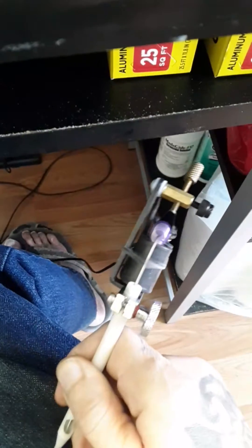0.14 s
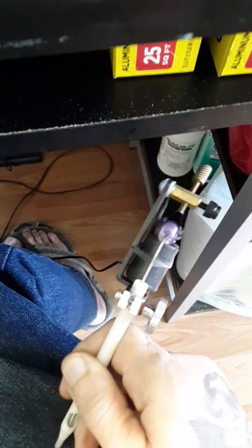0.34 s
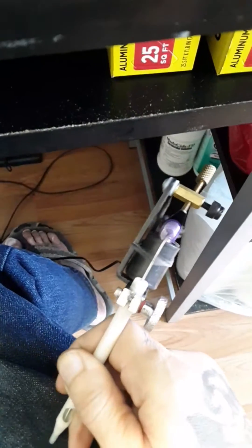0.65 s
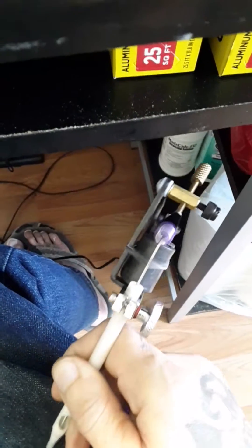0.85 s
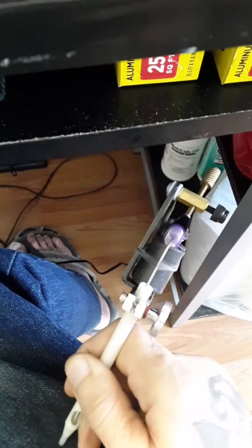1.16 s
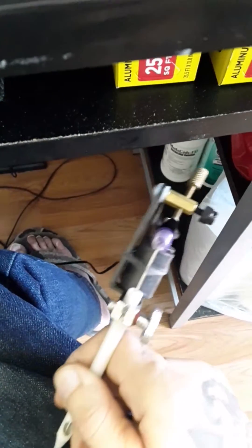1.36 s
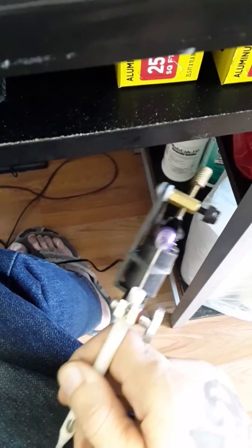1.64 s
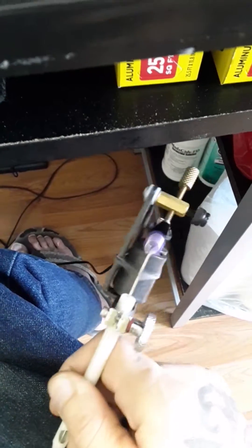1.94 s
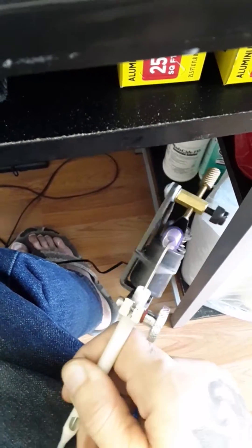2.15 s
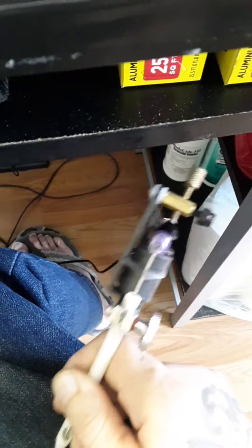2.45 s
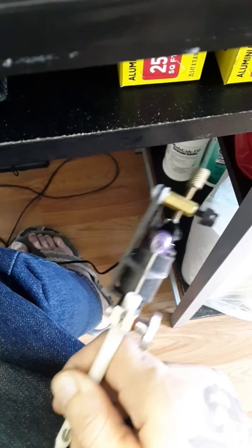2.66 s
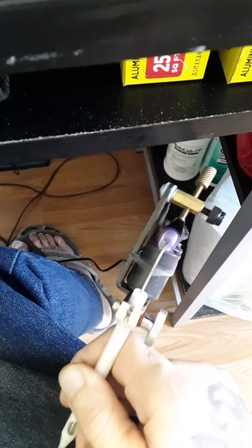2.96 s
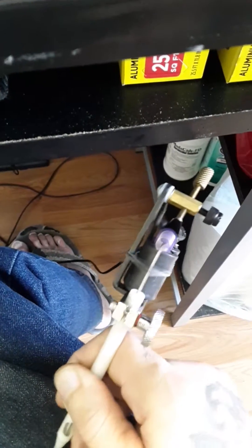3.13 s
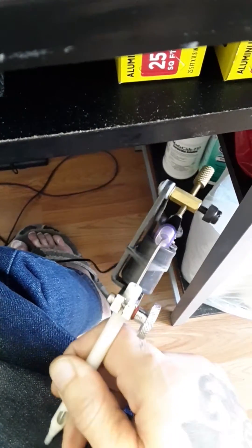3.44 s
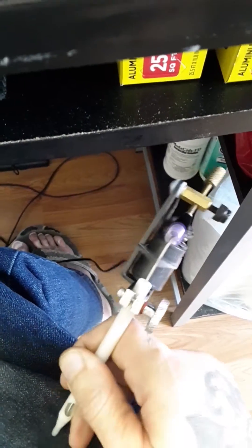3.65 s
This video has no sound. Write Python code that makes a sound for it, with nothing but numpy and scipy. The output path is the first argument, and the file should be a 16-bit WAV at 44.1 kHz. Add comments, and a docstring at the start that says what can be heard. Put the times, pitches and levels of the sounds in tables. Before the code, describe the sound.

A coil tattoo machine runs throughout in a small room, close to the microphones: a harsh, bright metallic buzz of rapid clicks and rattle, briefly weakening and stumbling five times, with faint hum beneath.

```python
"""A small room, microphones close: a coil tattoo machine buzzes in a hand.
Its armature strikes about 80 times a second. Each blow is a train of impulses sent through filters and
decaying modes: a bright click, spring tick, low knock, ringing steel frame, clatter and needle-bar rattle.
Five times the stroke is damped, so that the blows slow, weaken and stumble.
Sine partials of the stroke rate make the hum; faint tones and filtered room noise lie below."""
import sys
import numpy as np
from scipy import signal
from scipy.fft import rfft, irfft, next_fast_len
from scipy.io import wavfile
from scipy.ndimage import map_coordinates

SR = 44100
rng = np.random.default_rng(int(sys.argv[2]) if len(sys.argv) > 2 else 0)


def materialize(psi):
    """Save the field psi as 16-bit PCM at rate SR to the path in sys.argv[1].

    A 1-D psi becomes a single channel; in a 2-D psi each row is a channel.
    """
    bounded = np.clip(np.atleast_2d(psi).T, -1, 1)
    quanta = np.round(bounded * 32767).astype(np.int16)
    wavfile.write(sys.argv[1], SR, quanta)


N = 167580
FULL_DB = -28  # ringing level of a full stroke


def amp(db):
    """Amplitude ratio of a level in dB."""
    return 10 ** (np.asarray(db) / 20)


def unit(x):
    """x scaled to an rms of 1."""
    return x / np.sqrt(np.mean(x ** 2) + 1e-20)


def along(points, hz):
    """Interpolates (frequency [Hz], value) points on a log frequency axis."""
    f, v = np.transpose(points)
    return np.interp(np.log(hz + 1), np.log(f + 1), v)


def curves(rows):
    """One value per sample for each column after the time [s]."""
    s, *cols = np.transpose(rows)
    return [np.interp(np.arange(N) / SR, s, c) for c in cols]


def wobble(rate):
    """A smooth random curve through normal draws, rate knots a second."""
    knots = rng.standard_normal(int(N * rate / SR) + 4)
    return map_coordinates(knots, [np.arange(N) * rate / SR])


def sides(pan_db):
    """Left and right gains of constant power; positive pan_db leans left."""
    g = amp(np.array([[.5], [-.5]]) * pan_db)
    return g / np.sqrt(np.mean(g ** 2, axis=0))


def colour(points, pan, size=2048):
    """Minimum-phase stereo impulse response with a given spectrum and balance."""
    hz = np.fft.rfftfreq(size, 1 / SR)
    magnitude = amp(along(points, hz)) * sides(along(pan, hz))
    cepstrum = irfft(np.log(magnitude))
    # folding the cepstrum forward in time makes the response causal
    cepstrum[:, 1:size // 2] *= 2
    cepstrum[:, size // 2 + 1:] = 0
    return irfft(np.exp(rfft(cepstrum)))


def through(x, response):
    """x convolved with a stereo response scaled to a mean energy of 1 per side."""
    response = response / np.sqrt(np.sum(response ** 2) / 2)
    return signal.fftconvolve(np.atleast_2d(x), response, axes=1)[:, :N]


def filtered(x, response):
    """x times a gain that depends on frequency."""
    m = next_fast_len(N + SR // 2)
    gain = response(np.fft.rfftfreq(m, 1 / SR))
    return irfft(rfft(x, m) * gain, m)[..., :N]


def delayed(x, delay_s):
    """x a moment later."""
    return np.interp(np.arange(N) - round(delay_s * SR), np.arange(N), x, left=0)


APART_HZ = 1600  # above this the two microphones hear unrelated noise


def pair(size):
    """Stereo noise, alike in the bass and unrelated in the treble."""
    mid, side = rfft(rng.standard_normal((2, size)))
    turn = np.pi / 4 * np.minimum(np.fft.rfftfreq(size, 1 / SR) / APART_HZ, 1)
    return irfft(np.cos(turn) * mid + np.sin(turn) * np.array([side, -side]), size)


def pulses(at, level_db, scatter_db, size=8):
    """Impulses placed between samples by windowed sincs, whose rms follows a level curve."""
    k = np.floor(at).astype(int)[:, None] + np.arange(1 - size, size + 1)
    d = k - at[:, None]
    pulse_db = np.interp(at, np.arange(N), level_db) + scatter_db * rng.standard_normal(len(at))
    gain = amp(pulse_db) * np.sqrt(N / len(at))
    taps = gain[:, None] * np.sinc(d) * np.cos(np.pi * d / (2 * size)) ** 2
    return np.bincount(np.clip(k, 0, N).ravel(), taps.ravel(), N + 1)[:N]


# Spectrum of the room noise: (frequency [Hz], relative level [dB])
ROOM_NOISE = [(20, -29), (50, -20), (73, -13), (98, -13.5), (135, -9.5), (200, -9), (270, -12.5),
              (340, -9.5), (500, -18.5), (1000, -25), (3000, -14), (15000, -13.5)]
# Tones in the room: (frequency [Hz], left rms level [dB], right rms level [dB])
ROOM_TONES = [(706.3, -59, -80), (723.8, -69, -77), (802, -67, -71), (1050, -71, -74),
              (343.6, -65.5, -66.5), (131.6, -77, -63.5), (462, -68, -84)]
FLOOR_DB, FLOOR_SIDE_DB = -46, -10  # noise level before the low-level curve; side relative to middle


def room(low_db):
    """Low-weighted noise, mostly central, with a few faint tones of slightly wandering phase."""
    t = np.arange(N) / SR
    mid, side = unit(filtered(rng.standard_normal((2, N)), lambda hz: amp(along(ROOM_NOISE, hz))))
    noise = mid + amp(FLOOR_SIDE_DB) * np.array([side, -side])
    tones = np.zeros((2, N))
    for hz, left_db, right_db in ROOM_TONES:
        tone = np.sqrt(2) * np.sin(2 * np.pi * hz * t + 0.72 * wobble(7.9))
        tones += amp([[left_db], [right_db]]) * tone
    return amp(FLOOR_DB + low_db) * noise + tones


# Hum of coils and grip: (multiple of the stroke rate, peak level before the low-level curve [dB])
COIL_HUM = [(1, -67), (4, -76), (5, -75), (6, -76)]
# Surging partials: (time [s], level at twice the stroke rate [dB], at three times [dB]), before trim
HUM_SURGE = [(0.0, -63, -66), (0.89, -61, -69), (1.25, -55, -55.5), (1.33, -69, -64), (1.39, -62, -75),
             (1.52, -60, -62), (1.63, -59, -77), (1.66, -57.5, -60), (2.68, -60, -64), (2.71, -57, -71),
             (2.86, -58, -57), (3.06, -58, -75), (3.1, -65, -59), (3.19, -52, -57), (3.34, -64, -60),
             (3.39, -56, -68), (3.66, -61, -54), (3.8, -61, -55)]
# Trim of those two partials, in the same order: (level [dB])
SURGE_TRIM = [1, -.5]
# Buzz of the frame: (multiple of the stroke rate, peak level on a full stroke [dB])
FRAME_BUZZ = [(13, -75), (16, -73), (17, -72)]


def hum(turns, low_db, ring_db):
    """Sines at multiples of the stroke rate; second and third surge, the highest fade with the blows."""
    partials = [(k, db + low_db + 6.4 * wobble(5.78)) for k, db in COIL_HUM]
    for i, surge_db in enumerate(curves(HUM_SURGE)):
        partials.append((i + 2, surge_db + SURGE_TRIM[i] + 1.3 * wobble(8)))
    partials += [(k, db + ring_db - FULL_DB + 3.0 * wobble(19)) for k, db in FRAME_BUZZ]
    out = np.zeros(N)
    for k, db in partials:
        phase = 2 * np.pi * (round(k) * turns + rng.random()) + 0.5 * wobble(12)
        out += amp(db) * np.sin(phase)
    return out


STUMBLE_DB = -34  # around this ringing level and below, the timing scatters
STUMBLE_S, JITTER_S = .00046 / 3.5 ** 2, .000006  # most that weakness adds to the scatter; when free


def blow_times(turns, ring_db):
    """One blow per whole turn of the stroke, in samples; weak strokes land unevenly."""
    at = np.interp(np.arange(np.ceil(turns[0]), turns[-1]), turns, np.arange(N))
    force = np.exp(np.interp(at, np.arange(N), ring_db) - STUMBLE_DB)
    weak = (3.5 / (3.5 + force)) ** 2
    return at + SR * (JITTER_S + STUMBLE_S * weak) * rng.standard_normal(len(at))


# Spectrum of the bright ping: (frequency [Hz], relative level [dB])
PING_COLOUR = [(40, -70), (1500, -44), (4000, -24), (6000, -18), (7600, -9), (9000, -9), (9900, -3),
               (11000, -5), (11800, 3), (12400, 9.5), (12950, 10.5), (13550, 5.5), (14300, -6), (15200, -3),
               (16000, -20)]
# Balance of the ping: (frequency [Hz], left minus right [dB])
PING_PAN = [(2000, 4), (4000, -32), (6000, 41), (9000, 37), (11000, 10), (12700, 4.5), (15500, -20)]
# Spectrum of the hard tick: (frequency [Hz], relative level [dB])
TICK_COLOUR = [(40, -62), (800, -44), (1550, -29), (2600, -27), (3200, -11), (3500, 0), (3900, 4),
               (4400, 3.5), (5000, 1.5), (6000, -2.5), (7200, -3.5), (8500, 6), (9800, 2), (11000, -10),
               (12500, 9.5), (14500, -3), (16000, -37.5)]
# Balance of tick, clatter and rattle: (frequency [Hz], left minus right [dB])
BODY_PAN = [(200, -12), (800, 9.5), (1400, 6.5), (2100, -9), (3100, 4), (3900, 0.5), (4900, 1),
            (6500, -2.5), (8500, 3.5), (12500, 5), (15500, 2.5)]
PING_DB, TICK_DB = 2, -11.5
TICK_GROWS = 0.8  # dB of tick per dB of ringing
BOUNCE_S, BOUNCE_SPREAD_S, BOUNCE_DB = .0003, .0001, -13.5  # delay, its scatter, level against the blow
ECHO_S, ECHO_DB = 0.0014, -12  # a near surface throws the left ping to the right microphone


def click(at, click_db, ring_db):
    """The armature hits the coil core: a hard tick, and a bright ping with a chattering bounce."""
    bounces = at + SR * (BOUNCE_S + BOUNCE_SPREAD_S * rng.standard_normal(len(at)))
    contacts = pulses(at, click_db, scatter_db=0.3)
    contacts += pulses(bounces, click_db + BOUNCE_DB, scatter_db=2.5)
    ping = through(contacts, colour(PING_COLOUR, PING_PAN))
    ping[1] += amp(ECHO_DB) * delayed(ping[0], ECHO_S)
    tick_db = FULL_DB + TICK_GROWS * (ring_db - FULL_DB)
    tick = through(pulses(at, tick_db, scatter_db=1.86), colour(TICK_COLOUR, BODY_PAN))
    return amp(PING_DB) * ping + amp(TICK_DB) * tick


# Spectrum of the front spring on the contact screw: (frequency [Hz], relative level [dB])
SPRING_COLOUR = [(40, -72), (1200, -43), (2000, -26), (5500, -27), (6900, -6), (8400, -5), (9150, -5),
                 (9500, 10.5), (9900, 9), (11000, -7.5), (12500, -20), (16000, -36.5)]
SPRING_DB = -40.5


def spring(at):
    """The front spring ticks on the contact screw at every stroke, even a damped one."""
    ticks = pulses(at, np.full(N, SPRING_DB), scatter_db=2.0)
    return through(ticks, colour(SPRING_COLOUR, [(9500, 4.7)]))


# Strength of the low metallic knock: (time [s], level before the knock gain [dB])
KNOCK_FORCE = [(0.0, -49), (0.06, -44.5), (0.12, -48.5), (.5, -48), (1.05, -44), (1.26, -57), (1.36, -53),
               (1.53, -42), (1.75, -56), (1.95, -42), (2.23, -56), (2.34, -40), (2.45, -41), (2.55, -46),
               (2.6, -56), (2.8, -41), (2.98, -48), (3.13, -45), (3.57, -43), (3.68, -56), (3.8, -45)]
# Spectrum of the knock: (frequency [Hz], relative level [dB])
KNOCK_COLOUR = [(40, -70), (1000, -44), (1500, -26), (1700, -9), (1900, 0), (2200, -1), (2500, -12),
                (2900, -26), (4000, -40), (16000, -70)]
KNOCK_DB, KNOCK_PAN_DB = -4, 5  # gain; left minus right
KNOCK_LAG_S = .00088  # lag at the right microphone


def knock(at):
    """The armature bar knocks low and short, louder on free runs and later at the right microphone."""
    level_db, = curves(KNOCK_FORCE)
    blows = pulses(at, level_db + KNOCK_DB, scatter_db=1.0)
    left, right = through(blows, colour(KNOCK_COLOUR, [(2000, KNOCK_PAN_DB)]))
    return np.array([left, delayed(right, KNOCK_LAG_S)])


# Modes of frame and springs:
# (frequency [Hz], level before the frame gain [dB], 60 dB decay time [s], left minus right [dB])
STEEL_MODES = [(1900, -22, 0.03, -1), (3923, -15, 0.01, -10), (4900, -15.5, 0.006, 5),
               (7300, -11.5, 0.018, 7), (9350, -19, 0.03, 6), (9810, -13.5, .033, 5), (10090, -19, .03, 4),
               (11190, -10, 0.035, 2), (11320, -8, 0.038, 4), (11560, -9.5, 0.036, -2),
               (13550, -21, 0.02, -8), (15380, -21, 0.012, 0)]
FRAME_DB = 1.0
MODE_LAG_S = .00004  # spread of a mode's arrival between the microphones
# the spring swings back against the contact screw: delay, level at 10 kHz against the blow, tilt
RETURN_S, RETURN_DB, RETURN_DB_PER_OCT = .0065, -5, 0.5


def frame(at, ring_db):
    """Each blow and lighter spring return excites decaying sine modes of steel, each time a bit differently."""
    t = np.arange(SR // 8) / SR
    out = np.zeros((2, N))
    for hz, db, t60, pan_db in STEEL_MODES:
        arrival = MODE_LAG_S * rng.standard_normal((2, 1))
        tone = np.sin(2 * np.pi * (hz * (t + arrival) + rng.random()))
        ring = tone * amp(-60 * t / t60) * sides(pan_db)
        blow_at = at + SR * .000012 * rng.standard_normal(len(at))
        blows = pulses(blow_at, ring_db, scatter_db=1.5)
        return_db = RETURN_DB + RETURN_DB_PER_OCT * np.log2(hz / 10 ** 4)
        return_at = at + SR * (RETURN_S + .0013 * rng.standard_normal(len(at)))
        returns = pulses(return_at, ring_db + return_db, scatter_db=-1.0)
        out += amp(db) * through(blows + returns, ring)
    return amp(FRAME_DB) * out


# Spectrum of the clatter and its room answer: (frequency [Hz], relative level [dB])
CLATTER_COLOUR = [(30, -70), (150, -27), (450, -26), (1000, -31.5), (1550, -28.5), (1900, -3), (2300, -8),
                  (2650, -19), (3150, -1), (3500, -19.5), (3900, -1), (4300, -2.5), (5000, -6), (6000, -5),
                  (6900, 4.5), (7900, -4.5), (8900, -1.5), (9700, 7), (10600, 4.5), (11800, 0),
                  (12600, 4.5), (13500, 2.5), (14200, -6), (15400, -7.5), (16000, -15.5)]
FADE_PER_S, FADE = 3.026, 0.69  # crossfade: knots a second, size of the turn between tails [rad]


def diffuse(x, t60, rise_s, size=12000):
    """Dense decaying noise, slowly crossfaded at random between two noise tails."""
    t = np.arange(size) / SR
    shape = amp(-60 * t / t60) * (1 - np.exp(-(t / rise_s) ** 2))
    tone = colour(CLATTER_COLOUR, BODY_PAN)
    turn = FADE * wobble(FADE_PER_S)
    out = np.zeros((2, N))
    for share in (np.cos(turn), np.sin(turn)):
        tail = signal.fftconvolve(pair(size) * shape, tone, axes=1)
        out += through(x * share, tail)
    return out


CLATTER_DB, CLATTER_T60 = -6, 0.01  # T60 in seconds
ANSWER_DB, ANSWER_T60 = -3, 0.21


def clatter(at, ring_db):
    """The many short modes of the small parts, then the answer of desk and room."""
    blows = pulses(at, ring_db, scatter_db=1.9)
    parts = diffuse(blows, CLATTER_T60, rise_s=0.00036)
    answer = diffuse(blows, ANSWER_T60, rise_s=0.014)
    return amp(CLATTER_DB) * parts + amp(ANSWER_DB) * answer


# Spectrum of the needle-bar rattle: (frequency [Hz], relative level [dB])
RATTLE_COLOUR = [(30, -32), (200, -23), (1200, -20), (1600, -20), (2000, -5.5), (2600, -13.5), (3150, -6.5),
                 (3500, -6), (4000, -3.5), (5400, -3.5), (6000, -3.5), (6900, -0.5), (8500, -4.5),
                 (9700, 4.5), (11000, -7.5), (12700, 0.5), (14200, -16.5), (15400, -17), (16000, -33)]
RATTLE_DB, RATTLE_T60 = -3, 0.059  # level against the ringing; decay in seconds


def rattle(at, ring_db):
    """The loose needle bar chatters after each blow: decaying bursts of noise, never twice alike."""
    fade = amp(-60 * np.arange(SR // 10) / SR / RATTLE_T60)
    bursts = signal.fftconvolve(pulses(at, np.zeros(N), scatter_db=1.87), fade)[:N]
    flicker = amp(0.58 * wobble(1100))
    grit = unit(bursts * flicker * pair(N))
    return through(grit * amp(ring_db + RATTLE_DB), colour(RATTLE_COLOUR, BODY_PAN))


# Stroke rate before its small random drift: (time [s], rate [blows per second])
STROKE_RATE = [(0.0, 82.07), (0.28, 79.68), (0.32, 80.88), (0.48, 80.35), (0.72, 80.28), (1.08, 80.3),
               (1.16, 79.33), (1.2, 76.71), (1.4, 78.87), (1.44, 81.43), (1.6, 80.17), (1.72, 76.83),
               (1.84, 80.68), (2.0, 81.45), (2.2, 76.62), (2.24, 79.58), (2.36, 81.91), (2.52, 79.51),
               (2.56, 76.57), (2.64, 79.67), (2.88, 81.14), (3.04, 78.85), (3.08, 80.47), (3.48, 81.21),
               (3.52, 82.35), (3.64, 77.33), (3.8, 80.76)]
# Strength of the blows, before each part's gain: (time [s], ringing level [dB], click level [dB])
BLOW_FORCE = [(0.005, -28.5, -33.5), (0.128, -30.5, -31.5), (0.19, -32.5, -36), (0.774, -28.5, -30),
              (1.098, -29, -29), (1.187, -30, -33), (1.227, -37, -50), (1.266, -42, -50), (1.277, -30, -35),
              (1.292, -49, -49), (1.316, -40, -52), (1.329, -33, -35), (1.419, -30, -36),
              (1.455, -28.5, -28.5), (1.591, -28, -30), (1.705, -31.5, -37), (1.721, -35.5, -51.2),
              (1.757, -38.5, -50.1), (1.769, -31, -34), (1.783, -41, -48), (1.797, -47, -50),
              (1.806, -31.5, -35), (1.82, -32, -41), (1.832, -28, -28), (1.857, -30, -30),
              (1.932, -27, -25), (2.208, -30.5, -39), (2.236, -51, -57), (2.249, -38, -50),
              (2.259, -30, -35), (2.296, -29, -28), (2.419, -26, -26.5), (2.57, -29.5, -33),
              (2.585, -36, -49), (2.623, -42, -50), (2.634, -30.5, -32.5), (2.7, -29.5, -34),
              (2.734, -29, -27), (2.908, -27, -28), (2.97, -29.5, -32.5), (3.12, -28.5, -29.5),
              (3.133, -27.5, -25.5), (3.158, -27.5, -26.5), (3.22, -28, -29), (3.516, -28, -25.5),
              (3.615, -29, -29), (3.667, -33, -42), (3.681, -37, -47), (3.692, -35, -43),
              (3.72, -31.5, -33), (3.793, -30, -27.5)]
# Gain of the coil hum and room noise: (time [s], level [dB])
LOW_LEVEL = [(0, 2.5), (.7, 0), (1.2, 3), (2.9, 3.5), (3.8, 0.5)]
START_TURN = -.42  # strokes before the first blow


def scene():
    """One stroke drives every part of the machine, with the room beneath."""
    rate, = curves(STROKE_RATE)
    ring_db, click_db = curves(BLOW_FORCE)
    low_db, = curves(LOW_LEVEL)
    turns = START_TURN + np.cumsum(rate + 0.1097 * wobble(20)) / SR
    at = blow_times(turns, ring_db)
    contacts = click(at, click_db, ring_db) + spring(at) + knock(at)
    body = frame(at, ring_db) + clatter(at, ring_db) + rattle(at, ring_db)
    background = hum(turns, low_db, ring_db) + room(low_db)
    return contacts + body + background


TOP_HZ = 15950


def record(dry):
    """The recorder keeps nothing above its band limit."""
    return filtered(dry, lambda hz: hz < TOP_HZ)


dry = scene()
out = record(dry)
materialize(out)
```